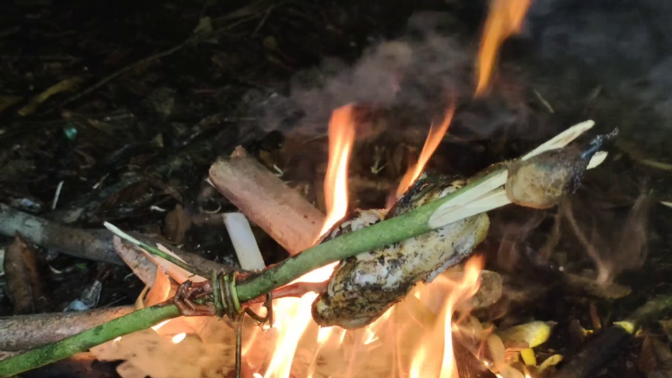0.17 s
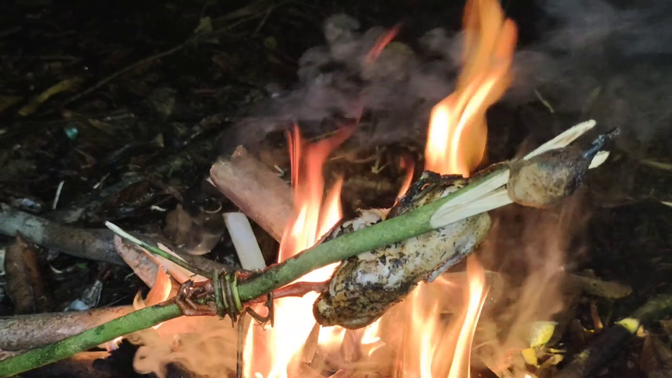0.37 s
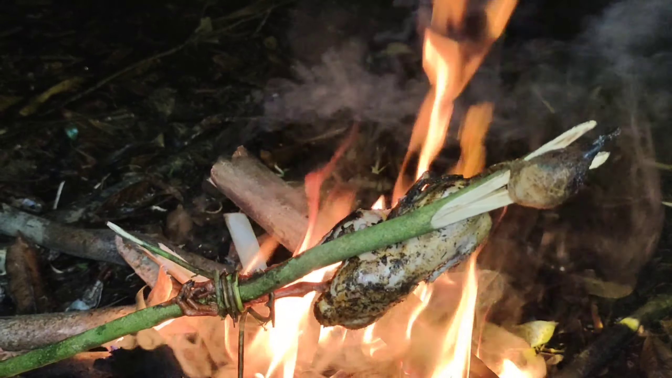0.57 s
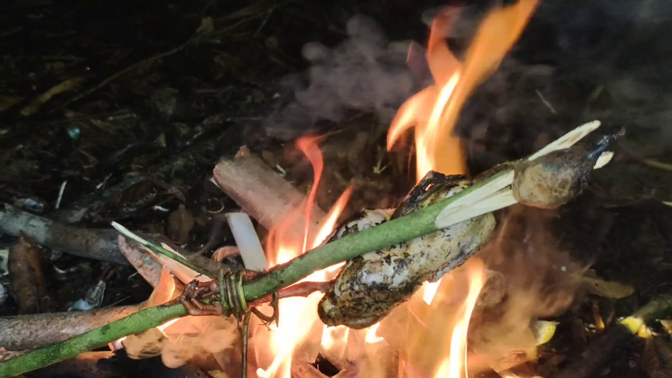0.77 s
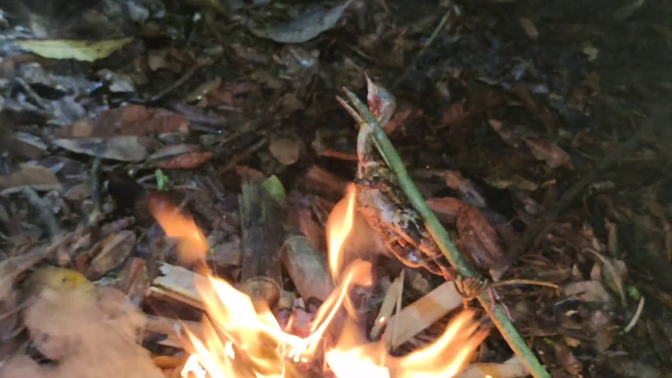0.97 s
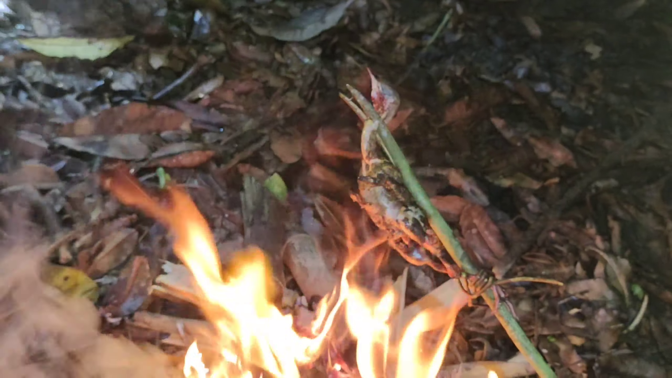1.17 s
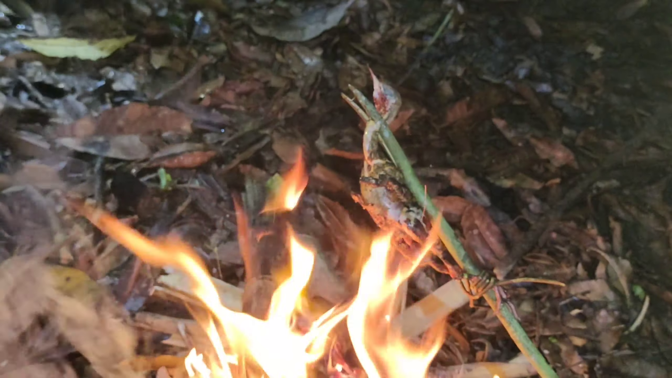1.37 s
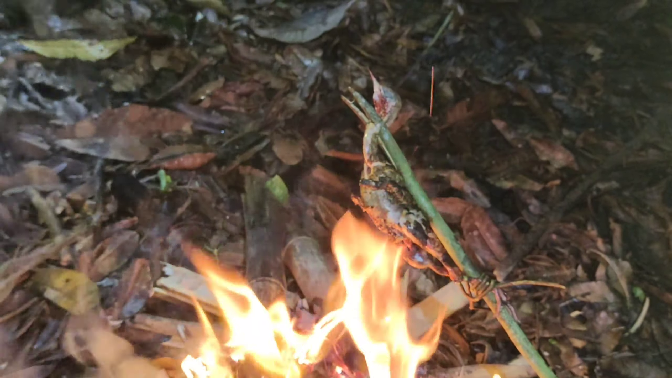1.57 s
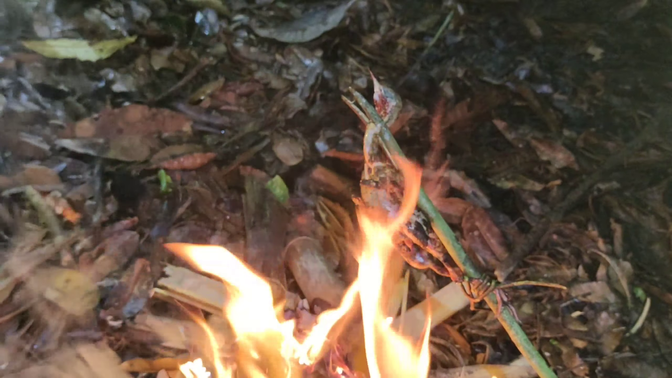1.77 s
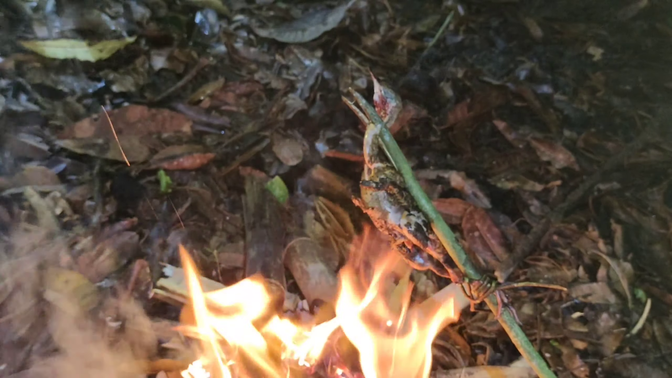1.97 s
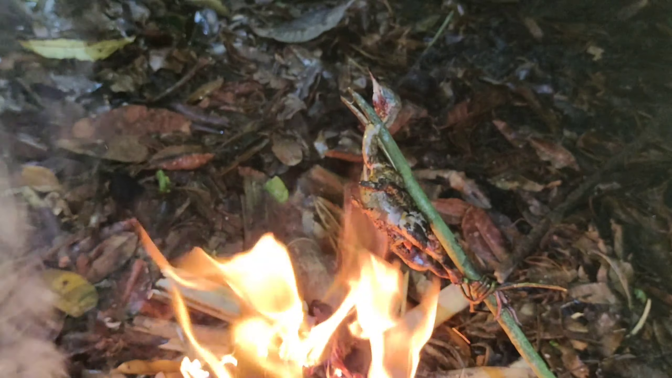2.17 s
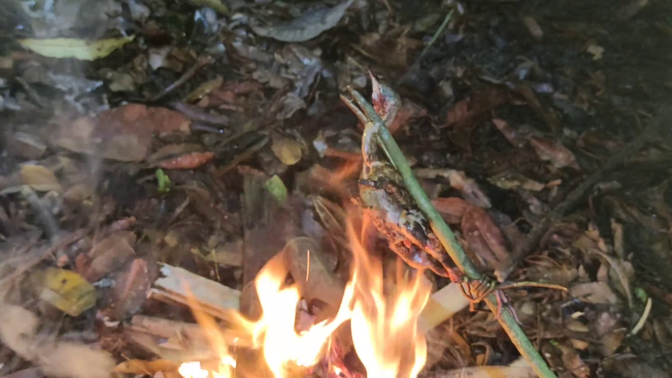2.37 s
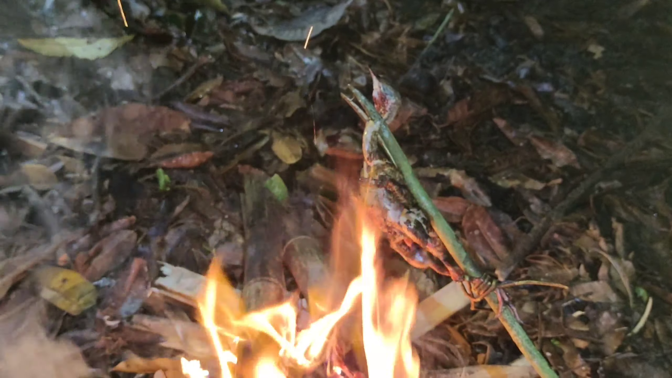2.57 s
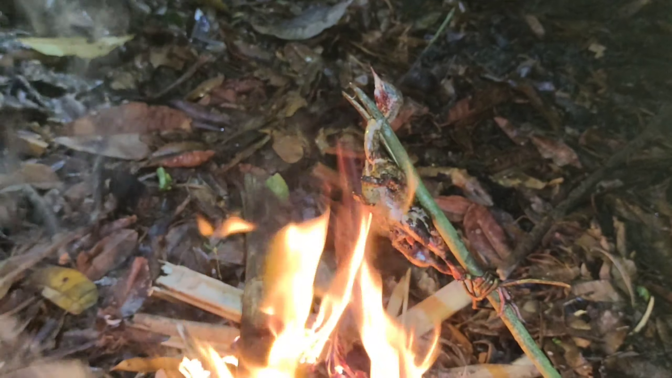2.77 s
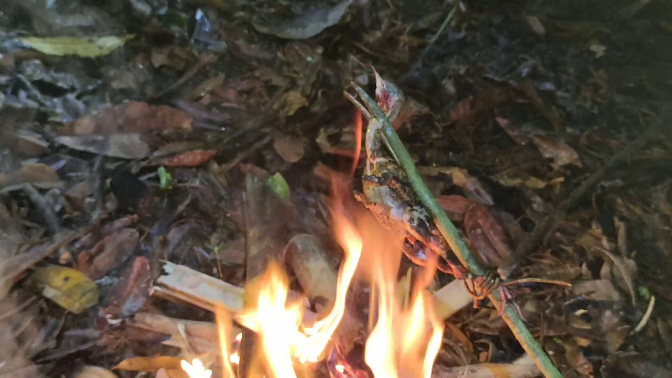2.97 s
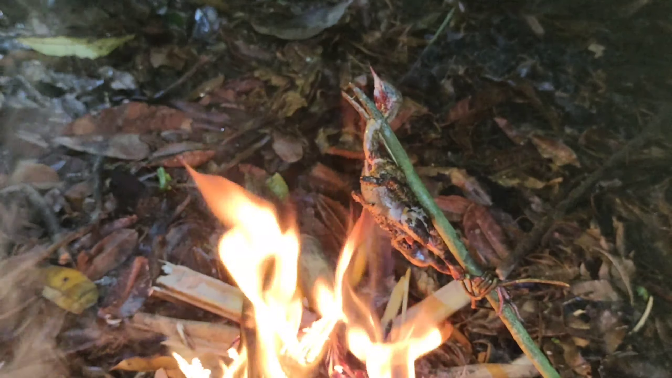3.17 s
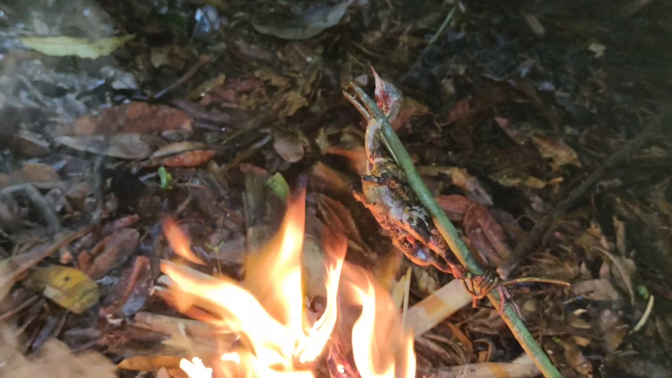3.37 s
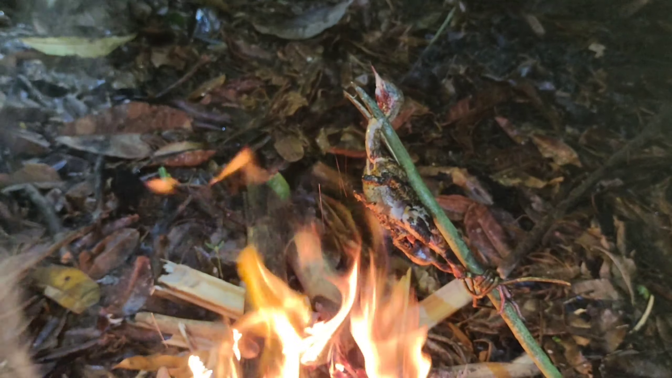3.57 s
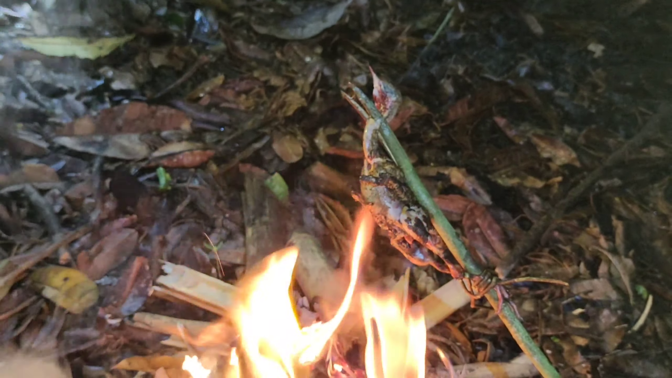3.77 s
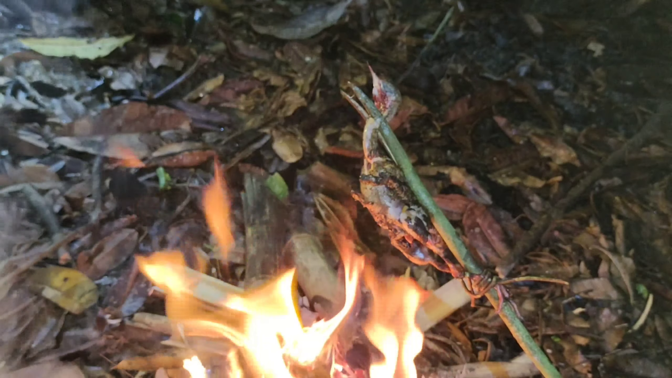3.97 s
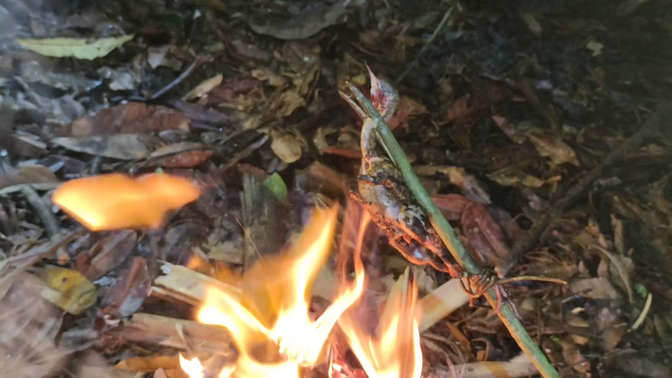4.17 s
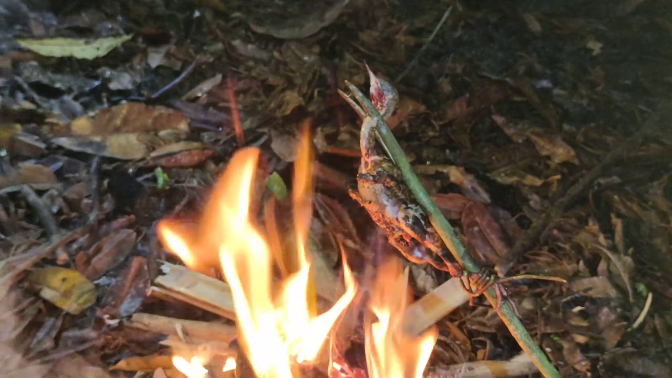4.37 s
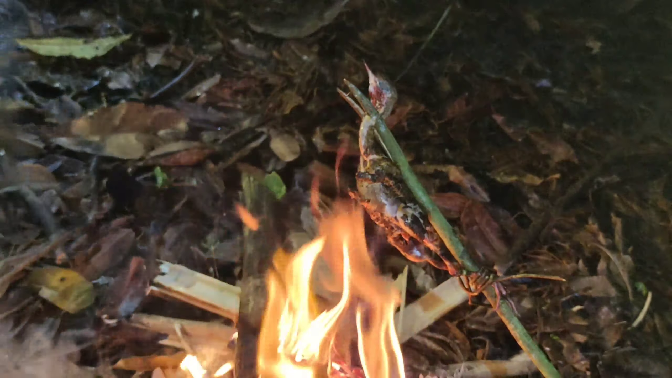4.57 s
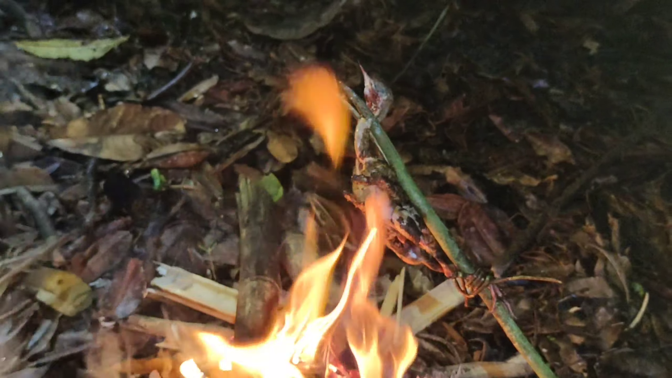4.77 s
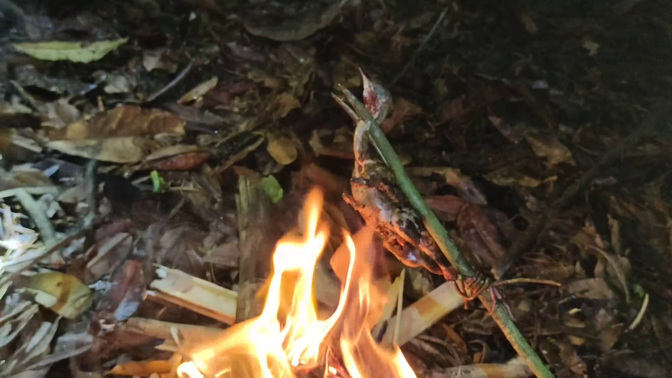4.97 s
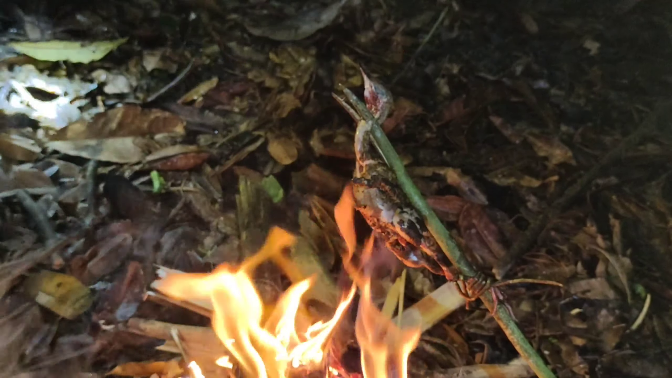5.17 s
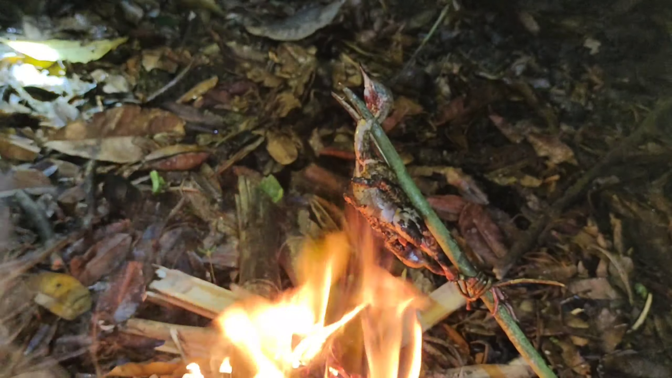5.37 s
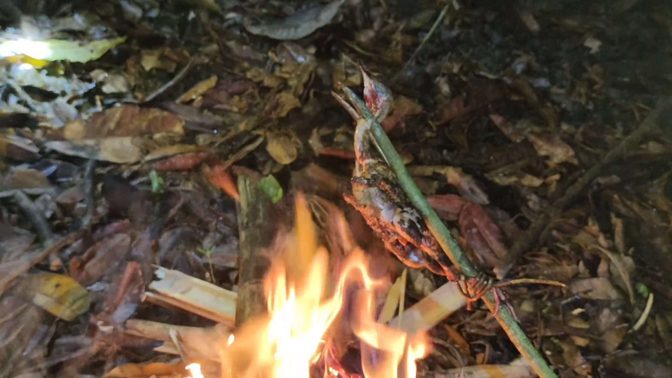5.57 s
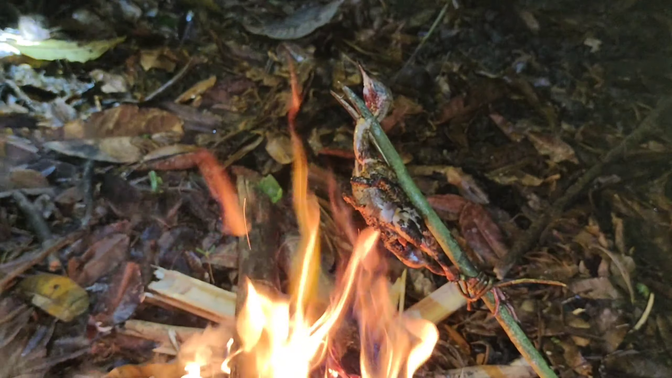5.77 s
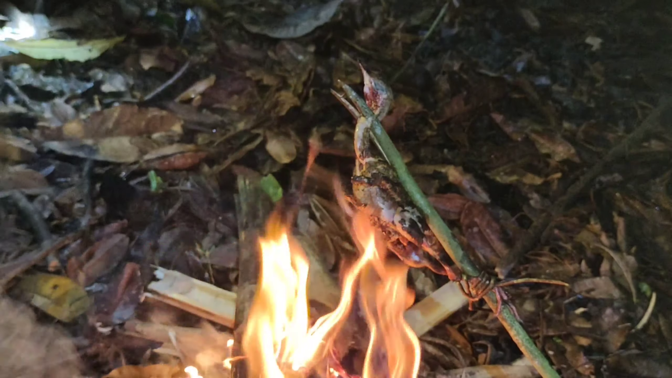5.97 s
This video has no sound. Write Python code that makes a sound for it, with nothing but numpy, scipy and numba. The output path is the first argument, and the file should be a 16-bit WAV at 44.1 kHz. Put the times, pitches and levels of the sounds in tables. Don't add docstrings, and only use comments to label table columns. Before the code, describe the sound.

Buzzing katydids and thin cricket trills fill a hissing forest while a small wood fire crackles, with one sharp snap around two and a half seconds.

```python
import sys
import numpy as np
from scipy import signal
from scipy.fft import rfft, irfft
from scipy.io import wavfile
from scipy.ndimage import uniform_filter1d
from numba import njit

SR = 44100
rng = np.random.default_rng(int(sys.argv[2]) if len(sys.argv) > 2 else 0)


def amplitude_ratio(level_db):
    exponent = np.asarray(level_db, float) / 20
    return 10 ** exponent


def to_wav(sig):
    pcm = np.clip(np.atleast_2d(sig), -1, 1) * 32767
    pcm = np.round(pcm).astype(np.int16)
    wavfile.write(sys.argv[1], SR, pcm.T)


N = 265041
T = np.arange(N) / SR

# start [t/s], length [t/s], level [dB], wing [f/Hz], left minus right [dB]
KATYDID_PHRASES = [
    (-.08, 0.53, -45, 6690, -1),
    (0.67, 0.44, -46, 6710, 3.5),
    (0.94, 0.75, -48.5, 6680, 4),
    (1.73, 0.62, -45, 6610, 6),
    (2.384, 0.6, -48.5, 6760, 5),
    (2.88, 0.72, -47, 6580, 5),
    (3.794, 0.79, -48, 6590, 6.5),
    (4.393, 0.71, -48, 6570, 3.5),
    (5.17, 0.87, -48, 6660, 5),
]
# time [t/s], body peak [level/dB], crack [level/dB], left minus right [dB]
WOOD_SNAPS = [(0.034, -44, -56, -1), (0.624, -41, -56, 2.0), (0.961, -40.5, -50, -4),
              (1.146, -45.5, -51.5, 3), (1.262, -45, -49.5, -2), (1.2981, -54, -56, 4),
              (1.687, -57, -59, 3), (1.821, -39, -48, -2), (1.848, -43, -54, 8), (2.28, -41.5, -55, 2),
              (2.469, -28.5, -43.5, -3), (2.992, -54, -50.5, 0), (3.119, -42, -59, -3),
              (3.1415, -34.5, -62, 1), (3.188, -37, -43, 1.5), (3.2431, -39, -56, 0.5),
              (3.44, -35, -49.5, 0), (3.598, -36, -52, 1), (3.74, -38.5, -61, 2), (3.782, -54, -49.5, -3),
              (3.903, -40.5, -58, -1), (4.168, -41, -69, 0.0), (4.352, -45, -46.5, 0),
              (4.613, -42, -55, -2), (4.796, -59, -52.5, 0), (4.841, -56, -44.5, -3),
              (5.008, -38.5, -52, -2), (5.362, -41, -49.5, -2), (5.596, -40, -54, -2),
              (5.796, -43, -69, -5)]
# start [t/s], end [t/s], wing [f/Hz], level [dB], left minus right [dB]
CRICKET_TRILLS = [(0, .12, 4500, -72, 1), (0.415, .68, 4470, -57.5, -12), (0.983, 1.081, 4470, -48, -5),
                  (1.496, 1.825, 4535, -50, -6), (1.45, 1.75, 4360, -78, 0),
                  (2.127, 2.418, 4444, -54.5, -5), (2.569, 2.91, 4535, -49.5, -6),
                  (3.236, 3.547, 4532, -48.5, -3.5), (3.982, 4.27, 4545, -48.5, -4),
                  (4.55, 5.098, 4530, -57, -3), (5.242, 5.575, 4530, -55.5, -7.5),
                  (5.614, 5.778, 4450, -59.5, -3), (5.93, 6.01, 4530, -52, 1),
                  (0.295, 0.346, 4720, -48.5, -3), (.41, .47, 4790, -53, -6), (0.531, 0.584, 4690, -46, -3),
                  (0.647, 0.724, 4720, -55, -6)]
# start [t/s], length [t/s], level [dB]
TREE_CRICKET_BOUTS = [
    (0.962, 1.4, -53),
    (2.888, 2.28, -52),
    (5.58, 0.38, -54),
]
# time [t/s], peak [level/dB], pitch [f/Hz], sharp edge [level/dB]
FLAME_FLAPS = [(0.049, -53, 129, -61), (0.316, -45.5, 159, -67), (0.351, -49, 140, -65),
               (0.383, -50, 108, -66), (0.458, -48, 145, -57), (0.5, -51, 106, -71),
               (0.58, -48, 164, -58.5), (0.626, -46, 143, -66), (0.718, -48, 131, -81),
               (0.795, -52, 110, -80), (0.873, -47, 166, -55), (1.206, -57, 167, -61.5),
               (1.356, -48, 165, -62), (1.785, -47.5, 147, -76), (1.835, -50, 170, -69),
               (2.692, -46, 130, -75), (2.816, -44.5, 196, -57.5), (2.998, -50.5, 232, -67),
               (3.137, -54, 152, -55), (3.646, -43.5, 110, -62), (3.9, -44.5, 96, -66),
               (4.017, -51, 94.2, -56.5), (4.053, -59, 234, -62), (4.186, -47.5, 147, -67),
               (4.35, -49, 147, -62), (5.161, -47.5, 162, -61), (5.22, -52, 173, -64),
               (5.635, -60, 162, -63)]
# time [t/s], half length [t/s], pitch [f/Hz], width [f/Hz], level [dB]
GAS_DRONES = [
    (4.528, 0.12, 93.3, 7.4, -57.5),
    (4.75, 0.076, 95, 6, -52.5),
    (4.962, 0.08, 98.7, 10, -60),
    (5.457, 0.41, 161.2, 13, -64.5),
    (2.064, 0.067, 1043, 120, -67.5),
    (3.194, 0.006, 1180, 180, -52.5),
    (5.3, 0.44, 1807, 58, -74.5),
]
# [f/Hz], density [level/dB per Hz]
RUMBLE_COLOUR = [(15, -43), (25, -57), (81, -1.5), (124, 1), (173, -2), (432, -15), (900, -29.5),
                 (1170, -77), (1980, -120)]
# time [t/s], heat [0-1]
SAP_HEAT = [
    (0, 0.),
    (2, .05),
    (3.2, 0.87),
    (4.6, 0.4),
    (6.01, .2),
]
# time [t/s], half length [t/s], steam whistle [level/dB], wet sizzle [level/dB]
SAP_SPURTS = [(0.617, 0.024, -84, -82), (0.945, 0.11, -83, -67.5), (1.27, 0.012, -67, -74),
              (1.853, 0.023, -62, -61), (2.124, 0.044, -63, -62), (3.007, 0.064, -52, -83),
              (3.165, 0.039, -60, -61), (3.482, 0.053, -71, -59), (3.727, .07, -52, -73),
              (3.79, 0.025, -64, -54), (4.126, 0.051, -54, -69), (4.372, 0.015, -62, -57),
              (4.497, 0.073, -49.5, -69), (4.61, 0.047, -57, -62.5), (4.696, 0.05, -55, -70),
              (4.846, 0.056, -52, -48.5), (4.935, 0.016, -62, -51), (5.055, 0.097, -52.5, -65),
              (5.37, 0.018, -69, -59), (5.45, 0.096, -50, -67), (5.725, 0.02, -61, -87)]
# [f/Hz], density [level/dB per Hz]
STEAM_COLOUR = [(7000, -26.5), (10000, -4), (12500, -1), (14000, 1.5), (15000, 4), (16500, -5)]
# [f/Hz], density [level/dB per Hz]
SIZZLE_COLOUR = [(450, -9), (700, 0), (1500, -1.5), (3000, 5.5), (5000, -4), (9000, 6), (12000, -4),
                 (15000, -16)]
# wing [f/Hz], width [f/Hz], stroke rate [1/s], level [dB]
FAR_SINGERS = [
    (3000, 640, 50, -69),
    (3384, 150, 45, -67.5),
    (3992, 130, 45, -64.5),
    (4561, 410, 55, -56.5),
    (5670, 440, 100, -59.5),
    (6396, 300, 92, -60),
]
# time [t/s], half length [t/s], level [dB]
HIGH_BUZZ = [
    (.2, 0.19, -60),
    (2.45, 0.63, -60),
    (3.6, .25, -64),
    (5.6, .35, -67),
]
# [f/Hz], density [level/dB per Hz]
AIR_COLOUR = [(300, -14), (600, -7.5), (1500, -11), (2500, -4), (3300, -8), (3700, 3.5), (4500, -37),
              (5050, 1.5), (5600, 5), (7500, 5.5), (10000, -4), (12000, -4), (15000, -9), (17000, -12)]
# [f/Hz], likeness [0-1]
PORT_LIKENESS = [(60, 0.93), (130, 0.94), (290, 0.78), (640, 0.4), (1410, 0.42), (3100, 0.35), (6820, 0.07),
                 (15000, 0.01)]
# [f/Hz], left minus right [level/dB]
PORT_TILT = [(300, -1), (3000, -0.4), (5500, 3), (6700, 2), (7700, 1.5), (8800, -7.5), (10500, -1),
             (13000, 2.5), (15000, 7)]
# [f/Hz], weakest band passed [level/dB]
GATE_FLOOR = [(1500, -94), (2600, -85.5), (3200, -82), (3700, -80), (4250, -81.5), (4850, -77),
              (5280, -76.5), (5500, -90), (9000, -95), (10500, -85.5), (12000, -83.5), (13500, -86.5),
              (15000, -95)]


def shape(points):
    hz, value = np.transpose(points)
    bin_hz = np.arange(N // 2 + 1) * SR / N
    return np.interp(np.log(bin_hz + 1), np.log(hz), value)


def unit(x):
    return x / np.sqrt(np.mean(x ** 2))


def sides(pan_db):
    return amplitude_ratio(np.array([pan_db / 2, -pan_db / 2]))


def bump(s, half_s):
    return np.exp(-((T - s) / half_s) ** 2)


def phrase(start, length, rise, fall):
    ramp = np.minimum((T - start) / rise, (start + length - T) / fall)
    return np.sin(np.pi / 2 * np.clip(ramp, 0, 1)) ** 2


def walk(rate):
    hold = int(SR / rate)
    steps = np.repeat(rng.standard_normal(N // hold + 1), hold)
    return unit(uniform_filter1d(uniform_filter1d(steps, hold), hold)[:N])


def hiss(colour, grains=1.):
    mid, side = rfft(grains * rng.standard_normal((2, N)))
    like = np.clip(shape(PORT_LIKENESS), 0, 1)
    pair = np.sqrt(1 + like) * mid + np.sqrt(1 - like) * side * np.array([[1], [-1]])
    return unit(irfft(pair * amplitude_ratio(shape(colour)), N))


@njit
def ring(x, hz, width_hz):
    y, z, pole = np.empty(len(x)), 0j, 0j
    for i in range(len(x)):
        if i == 0 or hz[i] != hz[i - 1]:
            pole = np.exp((2j * hz[i] - width_hz) * np.pi / SR)
        z = z * pole + x[i]
        y[i] = z.imag
    return y


def resonate(x, hz, width_hz):
    hz = hz + 0 * T
    once = ring(x, hz, 1. * width_hz)
    return unit(ring(once, hz, 1. * width_hz))


def strokes(rate, duty, wander):
    stroke_rate = rate * (1 + wander * walk(12))
    phase = (np.cumsum(stroke_rate) / SR + rng.random()) % 1
    return np.sin(np.pi * np.clip(phase / duty, 0, 1)) ** 2


def scrape(hz, width_hz, rate, blur, near):
    direct, left, right = rng.standard_normal((3, N))
    teeth = np.array([left + near * np.roll(direct, shift=2), right + near * direct])
    teeth = teeth * (blur + strokes(rate, 1.0, 0.0387))
    return np.array([resonate(x, hz, max(width_hz, 170)) for x in teeth])


def trees(x, t60_s, wet_db, lag_samples):
    t = T[:SR // 2]
    tail = rng.standard_normal((2, len(t))) * np.exp(-np.log(1000) * t / t60_s)
    tail = amplitude_ratio(wet_db) * tail / np.sqrt(np.sum(tail ** 2, axis=1, keepdims=True))
    x = x * np.ones((2, 1))
    wet = signal.fftconvolve(x, tail, axes=1)[:, :N]
    direct = np.array([np.roll(x[0], shift=lag_samples), x[1]])
    return (direct + wet) / np.sqrt(1 + amplitude_ratio(2 * wet_db))


def katydids():
    swell_s, fade_s, sag_hz = 0.25, 0.19, 164
    rest_power, rest_hz = amplitude_ratio(2 * -54), 6650
    start, length, db, hz, pan_db = np.transpose(KATYDID_PHRASES)[:, :, None]
    power = (amplitude_ratio(db) * phrase(start, length, swell_s, fade_s)) ** 2
    sung_hz = hz - sag_hz * (1 - phrase(start, length, 1.44 * swell_s, 2 * fade_s))
    total = power.sum(axis=0) + rest_power
    hz = ((power * sung_hz).sum(axis=0) + rest_power * rest_hz) / total
    pan_db = (power * pan_db).sum(axis=0) / total
    out = 0
    for shift_hz, rate, share_db in [(-150, 58, -9.5), (17, 59, -5.5), (156, 107, -4)]:
        alternate = 1 + 0.44 * np.sin(np.pi * rate * T)
        voice = scrape(hz + shift_hz, 283, rate, 0.99, 0.61) * alternate
        out = out + voice * np.sqrt(total) * amplitude_ratio(share_db + 2 * walk(17))
    return trees(out, .2, -3, 3) * amplitude_ratio(0.43) * sides(pan_db)


def snaps():
    s, body_db, crack_db, pan_db = np.transpose(WOOD_SNAPS)
    t = T[:1200]
    out = np.zeros((2, N + len(t)))
    debris = rng.standard_normal((len(s), 2, len(t))) * np.exp(-t / 0.0049)
    knock = np.sin(2 * np.pi * 1800 * t) * np.exp(-t / 0.000073)
    click = -np.cos(2 * np.pi * 11500 * t) * np.exp(-t / .00006)
    small = signal.butter(3, 600, "high", fs=SR)
    for k, at in enumerate(((s + .0017) * SR).astype(int)):
        crack = click + 0.073 * debris[k]
        burst = amplitude_ratio(body_db[k] + 13.0) * knock + amplitude_ratio(crack_db[k] + 26.5) * crack
        out[:, at:at + len(t)] += sides(pan_db[k])[:, None] * signal.lfilter(*small, burst)
    return trees(out[:, :N], .08, -8, 1)


def crickets():
    out = np.zeros((2, N))
    for start, end, hz, db, pan_db in CRICKET_TRILLS:
        on = np.clip(np.minimum(T - start, end + .01 - T) / .025, 0, 1)
        throb = 0.62 + 0.77 * strokes(65, 0.75, 0.014) * amplitude_ratio(0.39 * walk(50))
        climb = 1 - 0.00299 * np.exp(-np.abs(T - start) / 0.0846)
        pitch_hz = hz * climb + 2 * walk(29.86)
        tone = np.sin(2 * np.pi * np.cumsum(pitch_hz) / SR)
        out += sides(pan_db)[:, None] * amplitude_ratio(db) * on * throb * tone
    return trees(out, .15, -14, 2)


def tree_cricket():
    edge_s, rest_db = 0.04, -64.5
    on = amplitude_ratio(rest_db)
    for s, length, db in TREE_CRICKET_BOUTS:
        on = on + amplitude_ratio(db) * phrase(s, length, edge_s, edge_s)
    pitch_hz = 7710 + 20 * walk(80)
    tone = strokes(96, 0.87, 0.0025) * np.sin(2 * np.pi * np.cumsum(pitch_hz) / SR)
    voice = unit(tone) + 1.6 * scrape(7700, 170, 96, .4, .6)
    return voice * on * amplitude_ratio(-10.5) * sides(3.3)[:, None]


def flames():
    rumble_db, flutter_db, flap_cycles = -60.5, 1.87, 0.63
    out = amplitude_ratio(rumble_db + flutter_db * walk(14)) * hiss(RUMBLE_COLOUR)
    for s, peak_db, hz, edge_db in FLAME_FLAPS:
        flap = bump(s + 0.0063, flap_cycles / hz) * np.sin(2 * np.pi * hz * (T - s))
        edge = bump(s + 0.0086, 0.0017) * np.sin(2 * np.pi * 380 * (T - s))
        out = out + amplitude_ratio(peak_db) * flap + amplitude_ratio(edge_db + 8) * edge
    for s, half_s, hz, width_hz, db in GAS_DRONES:
        out = out + amplitude_ratio(db) * bump(s, half_s) * resonate(rng.standard_normal(N), hz, width_hz)
    return signal.sosfilt(signal.butter(2, 55, "high", fs=SR, output="sos"), out)


def sap():
    heat = np.interp(T, *np.transpose(SAP_HEAT))
    steam = amplitude_ratio(-59.5 + 5.5 * heat)
    sizzle = amplitude_ratio(-62.5 + 2.5 * heat)
    for s, half_s, steam_db, sizzle_db in SAP_SPURTS:
        spurt = bump(s, half_s)
        steam = steam + amplitude_ratio(steam_db) * spurt
        sizzle = sizzle + amplitude_ratio(sizzle_db) * spurt
    steam_grains = amplitude_ratio(2.6 * rng.exponential(size=N))
    sizzle_grains = amplitude_ratio(3.75 * np.minimum(rng.exponential(size=N), 7))
    steam = steam * amplitude_ratio(1.1 * walk(40)) * hiss(STEAM_COLOUR, steam_grains)
    return steam + sizzle * amplitude_ratio(1.2 * walk(25)) * hiss(SIZZLE_COLOUR, sizzle_grains)


def chorus():
    buzz = amplitude_ratio(-59.5)
    for s, half_s, db in HIGH_BUZZ:
        buzz = buzz + amplitude_ratio(db) * bump(s, half_s)
    out = scrape(8280, 230, 105, 1.9, 0.93) * buzz
    out = out + scrape(8840, 2350, 120, 9.2, 0.18) * amplitude_ratio(-56 + 1.01 * T)
    for hz, width_hz, rate, db in FAR_SINGERS:
        out = out + scrape(hz, width_hz, rate, 2.0, 0.32) * amplitude_ratio(db + 0.74 * walk(1.46))
    return out


def forest_air():
    return amplitude_ratio(-54.5 + 1.1 * walk(3.35)) * hiss(AIR_COLOUR)


def scene():
    near = katydids() + snaps() + crickets() + tree_cricket()
    return near + flames() + sap() + chorus() + forest_air()


def top_cut(x):
    return signal.sosfilt(signal.butter(12, 16620, fs=SR, output="sos"), x)


def record(dry):
    top_hz, waver_db = 15530, 6
    heard = irfft(rfft(dry) * sides(shape(PORT_TILT)), N)
    hz, _, cells = signal.stft(heard, SR, nperseg=2048)
    power = np.mean(np.abs(cells[:, :1024]) ** 2, axis=0)
    power = power.reshape(128, 8, -1).mean(axis=1)
    waver = uniform_filter1d(rng.standard_normal(power.shape), size=2)
    power = uniform_filter1d(power, size=2) * amplitude_ratio(waver_db * waver)
    power = np.repeat(power, 8, axis=0)
    floor_db = np.interp(hz[:1024], *np.transpose(GATE_FLOOR))[:, None]
    cells[:, :1024] *= 1 / (1 + (amplitude_ratio(2 * floor_db) / power) ** 16)
    cells[:, hz > top_hz] *= amplitude_ratio(-45)
    mix = signal.istft(cells, SR, nperseg=2048)[1][:, :N]
    return top_cut(mix)


dry = scene()
out = record(dry)
to_wav(out)
```